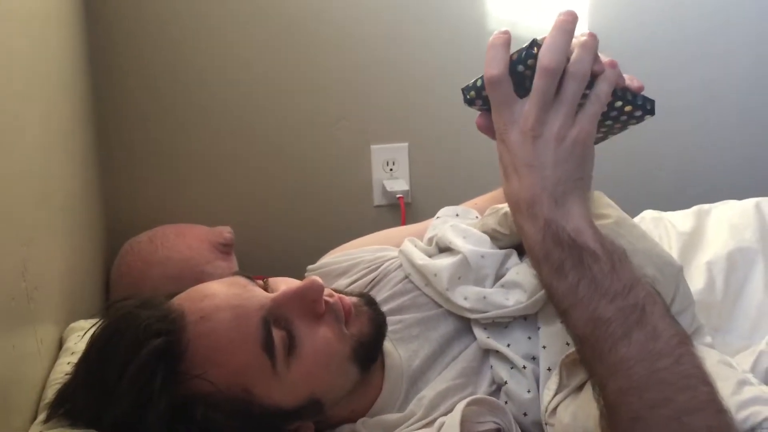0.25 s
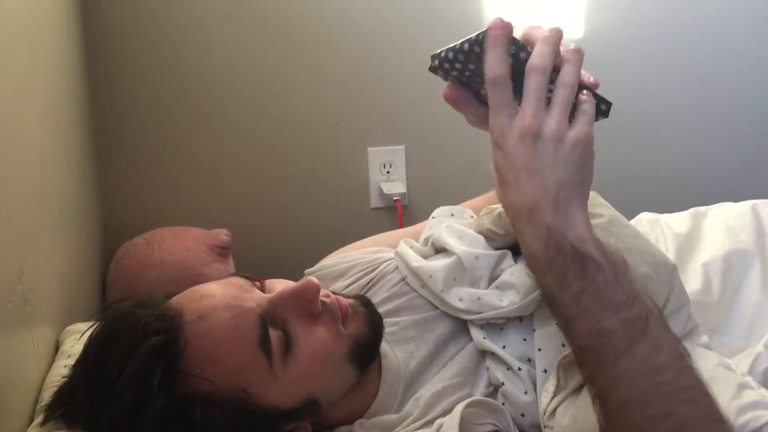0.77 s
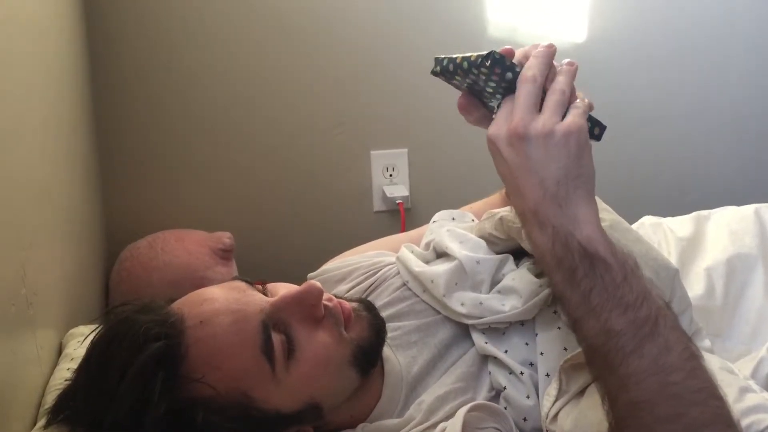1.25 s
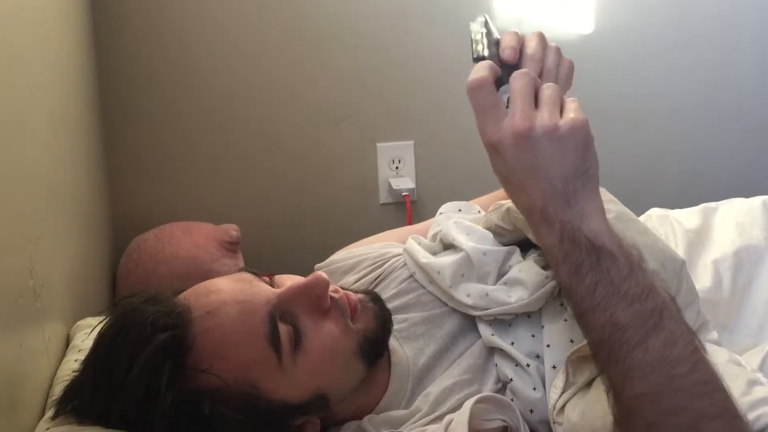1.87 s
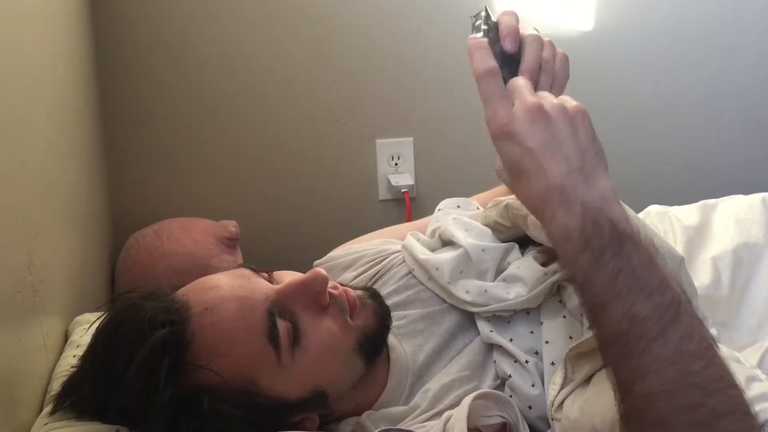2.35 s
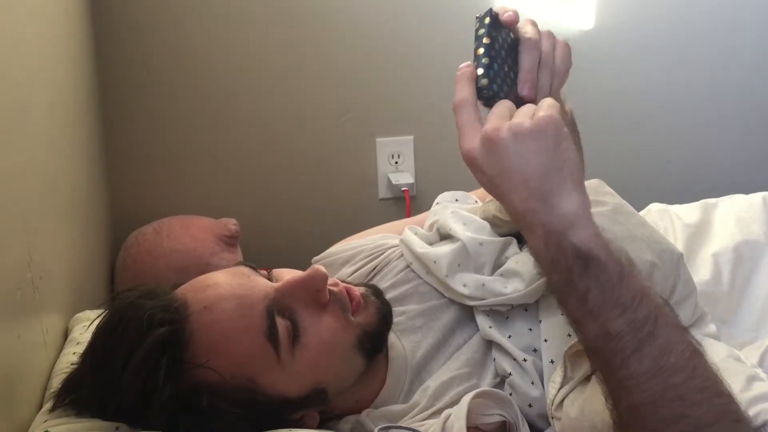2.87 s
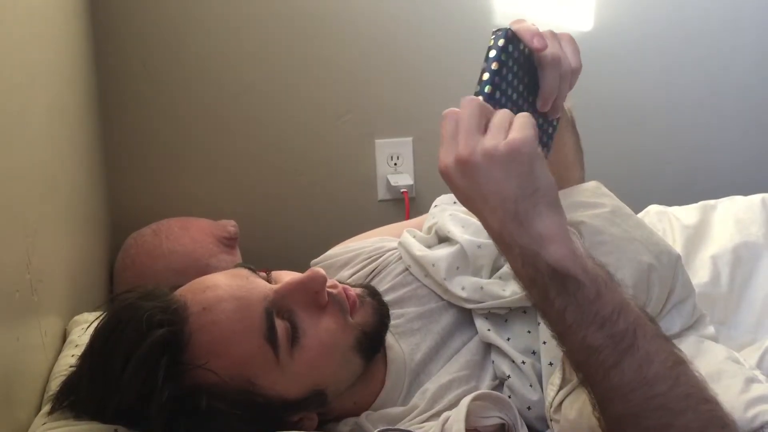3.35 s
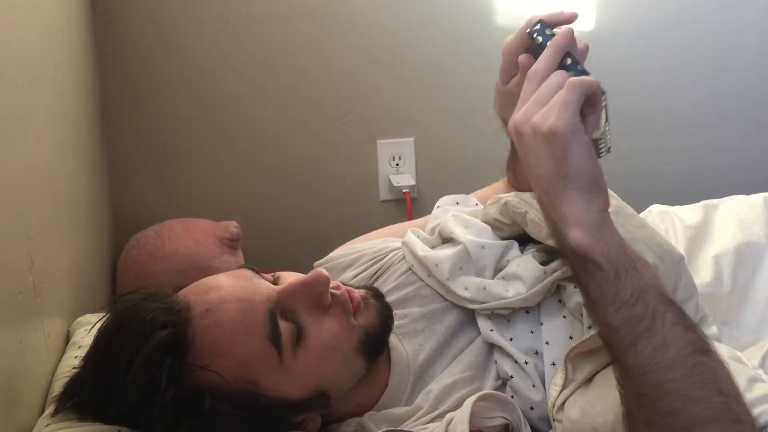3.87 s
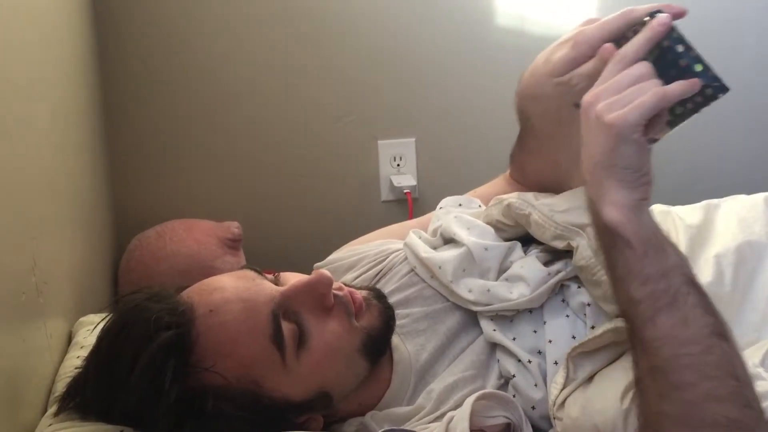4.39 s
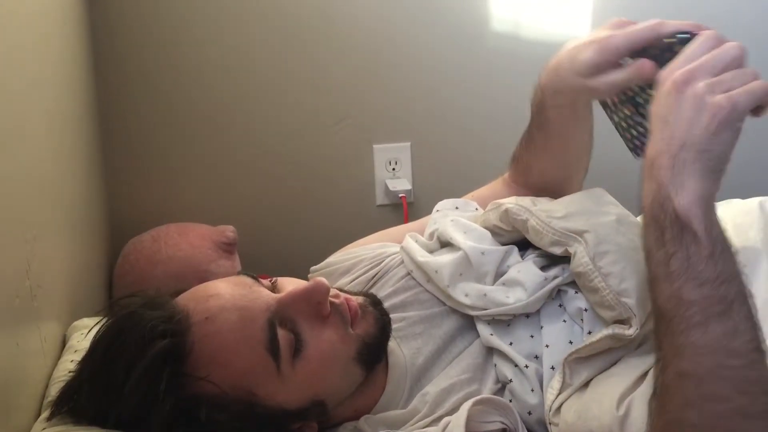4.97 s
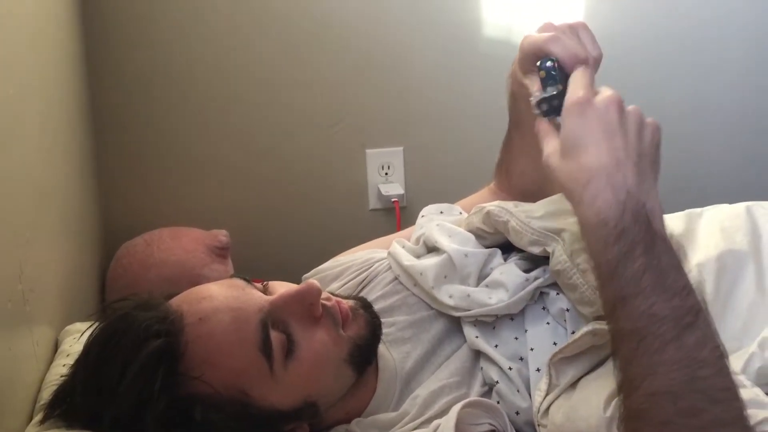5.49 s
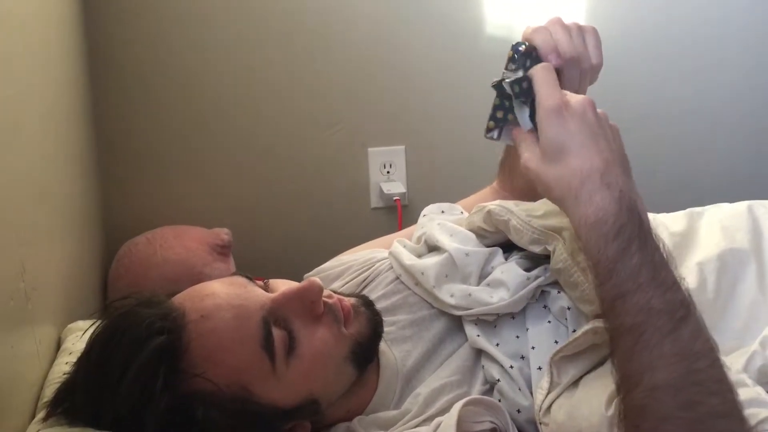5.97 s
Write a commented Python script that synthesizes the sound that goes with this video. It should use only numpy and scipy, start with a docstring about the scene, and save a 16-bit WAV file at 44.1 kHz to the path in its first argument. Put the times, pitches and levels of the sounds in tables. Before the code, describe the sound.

A small box in stiff, glossy gift paper is handled close to the microphone in a quiet bedroom, over faint hiss and low hum. Light snaps open the scene at 0 to 0.1 seconds, then a very sharp, loud double crack lands at 0.55. After a near pause, crackling and sliding rise from 1.25 to 1.9, with crisp snaps around 1.45 and 1.65. It thins out near 2.2; soft crinkles return at 2.4, and a broad rub and short falling squeak come around 2.8 to 2.95. Sparse light ticks and two faint squeaky rubs follow until 3.8. A cluster of snaps breaks out at 4.35 to 4.46, and a stronger one at 4.9 with a dull hollow box knock. From 5.1 to 6.2 smaller snaps and dry rustling continue, with a short, faint room echo.

```python
"""Sharp snaps of stiff gift paper over a low hum come first; then sliding, crackling and a few rubs and squeaks.
Hands pick at a small wrapped box and tear its paper, close to the microphone in a quiet bedroom.
Buckling creases are bursts of spiky noise that ring facets of paper; hollow knocks of the box go with them.
Sliding is noise, slips and small creases through wandering resonances; squeaks are gliding bands of noise.
Near echoes and a diffuse room tail answer the paper; filtered noise and tones form the background."""
import sys
import numpy as np
from scipy import signal
from scipy.fft import rfft, irfft, next_fast_len
from scipy.io import wavfile
from scipy.ndimage import map_coordinates

SR = 44100
rng = np.random.default_rng(int(sys.argv[2]) if len(sys.argv) > 2 else 0)


def to_wav(s):
    """Save 16-bit WAV."""
    ch = np.atleast_2d(s).T  # columns
    pcm = np.round(np.clip(ch, -1, 1) * 32767)  # PCM
    wavfile.write(sys.argv[1], SR, pcm.astype(np.int16))


N = 274895
TIME = np.arange(N) / SR


def gain_of(db):
    """Level law: decibels to an amplitude ratio."""
    return 10 ** (np.asarray(db) / 20)


def evened(x):
    """Normalization: scales to an rms of 1."""
    return x / np.sqrt(np.mean(x ** 2) + 1e-20)


def read(points, hz):
    """Interpolation of a spectral table on a logarithmic frequency axis."""
    f, value = np.transpose(points)
    return np.interp(np.log(hz + 1), np.log(f + 1), value)


def add(mix, s, sound):
    """Superposition: adds a sound to the mix, in place, from time s."""
    part = mix[max(0, round(s * SR)):][:len(sound)]
    part += sound[:len(part)]


def coloured(x, colour):
    """Linear filtering: multiplies the spectrum by a table of f/Hz, gain/dB."""
    size = next_fast_len(N + SR)
    gain = gain_of(read(colour, np.fft.rfftfreq(size, 1 / SR)))
    return irfft(rfft(x, size) * gain, size)[:N]


def noise(colour):
    """Stationary noise: white noise shaped by a spectral table, rms 1."""
    return evened(coloured(rng.standard_normal(N), colour))


def drift(per_s):
    """Slow random modulation: a smooth curve through per_s normal random points a second."""
    coarse = TIME[::64]
    points = rng.standard_normal(2048)
    curve = map_coordinates(points, [coarse * per_s], order=2, mode="wrap")
    return np.interp(TIME, coarse, curve)


# Low rumble of the room and the moving arms: t/s, relative level/dB
RUMBLE_LEVEL = [(0.0, -55), (1.5, -58.5), (2.2, -62.5), (2.78, -61.5), (2.86, -54), (3.8, -56.5),
                (4.75, -61), (4.91, -55.5), (5.01, -67.5), (6.23, -65.5)]
# Spectral shape of the rumble: f/Hz, relative level/dB
RUMBLE_SPECTRUM = [(22, -31), (35, -15.5), (45, -1), (72, -9.5), (92, 8), (122, 0.5), (155, -17),
                   (300, -35.5)]
# Spectral shape of the still air: f/Hz, relative level/dB
AIR_SPECTRUM = [(200, 0.5), (400, -4.5), (700, -14), (1500, -14), (4000, -24), (9000, -33.5), (16000, -36)]
# Steady hum tones: f/Hz, rms level/dB
HUM_TONES = [(60, -68), (91.5, -67.5)]


def background(rumble_db=1.0, air_db=-69, swell_db=0.5):
    """Stationary and modulated sources: swelling rumble, phase-wavering hum and faint hiss."""
    rumble_level = np.interp(TIME, *np.transpose(RUMBLE_LEVEL)) + rumble_db + swell_db * drift(9.2)
    rumble = gain_of(rumble_level) * noise(RUMBLE_SPECTRUM)
    hum = sum(gain_of(db) * np.sqrt(2) * np.sin(2 * np.pi * hz * TIME + .4 * drift(4.4))
              for hz, db in HUM_TONES)
    return rumble + hum + gain_of(air_db) * noise(AIR_SPECTRUM)


def facet(x, hz, width):
    """Damped resonance: a flat piece between creases rings briefly; width/Hz holds at 2 kHz, growing as sqrt(f)."""
    pole = np.exp((2j * np.pi * hz - np.pi * width * np.sqrt(hz / 2000)) / SR)
    return 2 * signal.lfilter([1 - abs(pole)], [1, -pole], x).real


# Bands of the whole sheet, wide panels, small facets and breaking fibres: low f/Hz, high f/Hz
VIBRATION_BANDS = [(340, 973), (1000, 2003.6), (2050, 6430), (6300, 15300)]
PAPER_FILTERS = [signal.butter(4, np.clip(edges, 20, SR / 2 - 100), "band", fs=SR, output="sos")
                 for edges in VIBRATION_BANDS]


def paper(sheet, flap_db, crisp_db, body_db):
    """Radiation by scale: weighs the sheet's vibration from its slow bending up to its fibres."""
    # relative to the small facets; the whole sheet follows the wide panels
    levels = (flap_db + body_db, flap_db, 0, crisp_db)
    return sum(gain_of(db) * evened(signal.sosfilt(sos, sheet)) for db, sos in zip(levels, PAPER_FILTERS))


def snap(level_db, flap_db, crisp_db, hz, main_db, others_db,
         ring=.018, spike_db=3, width=270, body_db=-18, rise=0.0004):
    """Buckling instability: a spiky noise burst rings the buckling facet and its random neighbours."""
    t = TIME[:1536]
    spikes = gain_of(spike_db * np.clip(rng.standard_normal(len(t)), -2, 2))
    run = rng.standard_normal(len(t)) * spikes
    # ring/s is the time to fall 60 dB, rise/s the onset's time constant
    run *= gain_of(-60 * t / ring) * (1 - np.exp(-t / rise))
    others_hz = np.geomspace(1200, 11000, num=9) * np.exp(rng.uniform(-.14, 0.12, 9))
    others = sum(rng.random() * facet(run, f, width) for f in others_hz)
    sheet = run + gain_of(main_db) * facet(run, hz, width) + gain_of(others_db) * others
    # the level refers to the same energy spread over 8 ms
    span_gain = np.sqrt(.008 * SR / len(t))
    return gain_of(level_db) * span_gain * paper(sheet, flap_db, crisp_db, body_db)


# Snaps of the paper: t/s, relative level/dB, wide-panel flap/dB, crispness/dB, buckling facet f/Hz
SNAPS = [(0.002, -35, -6.5, -8.5, 3830), (0.0423, -30.5, -6, -11, 1914), (0.1099, -24, -15.5, -14.5, 6230),
         (0.539, -21, -2, -6, 2110), (0.5513, -11.5, -7, 0, 4686), (0.5535, -12.5, -2.5, -6.5, 3300),
         (0.7322, -30.5, -39, -11, 4966), (1.0109, -46, -15, -17, 3300), (1.086, -45.5, -2.5, -5, 3500),
         (1.196, -49.5, -3, -5, 3675), (1.242, -46, -10, -1, 5300), (1.4312, -22, -4.5, 0, 2030),
         (1.4678, -21, -14, 2.5, 6600), (1.6396, -28.5, -3, -1, 6540), (1.763, -28.5, -12.5, -3, 2330),
         (1.8755, -38, -8, 0, 4680), (1.931, -44, 1.5, 5.5, 6720), (2.0654, -52, 0, -15, 2082),
         (2.398, -40.5, -15.5, -17, 3420), (2.4598, -37, -5, -9, 2120), (2.5405, -39.5, -6, -10, 1990),
         (2.8867, -37.5, -10.5, -2.5, 3580), (3.166, -34, -15, -4.5, 3240), (3.28, -40, -14.5, -3, 6880),
         (3.315, -42.5, -7, -12, 2170), (3.841, -44.5, -0.5, 0, 3254), (3.9169, -32, -10, -5.5, 3810),
         (4.1892, -50.5, -2, 7.5, 6503), (4.326, -44.5, 1.5, -20, 2745), (4.336, -43.5, -11, 3, 5170),
         (4.3528, -30, -10, 1, 6100), (4.4312, -21, -6, -16, 2880), (4.441, -27.5, -5.5, -1, 2760),
         (4.447, -39, 4, 9, 6600), (4.4635, -23.5, -36, -6.5, 4300), (4.883, -27.5, -6, -1.5, 5630),
         (4.8914, -18, -4, -9, 2500), (4.8983, -14.5, -5, -5, 2600), (5.037, -35, -7, -10, 2450),
         (5.109, -40, -2.5, -7.5, 2600), (5.217, -31, -7, -15.5, 2530), (5.5064, -37, -11.5, -12, 3200),
         (5.6492, -36.5, -5.5, -8, 3120), (5.6744, -33, -8, -7, 2730), (5.8246, -36, -29, -11, 6000),
         (5.8632, -33, -19.5, -6.5, 6300), (6.0294, -41, -1.5, -9, 3100), (6.0857, -42, -16, -0.5, 6400)]


def snaps(rows, main_db=9, others_db=5, room_main_db=1, room_others_db=-8, count=3):
    """Directivity: direct snaps favour one facet; those thrown in other directions favour it less."""
    direct, thrown = np.zeros(N), np.zeros((count, N))
    for s, *shape in rows:
        add(direct, s, snap(*shape, main_db, others_db))
        for way in thrown:
            add(way, s, snap(*shape, room_main_db, room_others_db) / np.sqrt(count))
    return direct, thrown


# Hollow modes of the box, before random variation: f/Hz, relative level/dB, t60/s
BOX_MODES = [(180, -1.5, 0.041), (272, -1.5, 0.098), (405, -3, 0.068), (520, 0, 0.057), (624, -0.5, 0.057)]
# Further hollow knocks of the box, some together with snaps: t/s, relative level/dB
FURTHER_KNOCKS = [(1.4342, -45), (1.6403, -46), (3.192, -47.5), (4.451, -40.5), (4.89, -39.5),
                  (4.91, -34.5), (5.026, -50)]


def knocks(box_db=2.0, tug_db=-35, tug_slope=0.54):
    """Modal excitation: each knock rings the box, each mode's pitch varying at random from knock to knock."""
    out, t = np.zeros(N), TIME[:4096]
    # every snap in the table tugs at the box; tug_slope is dB of knock per dB of wide-panel flap
    tugs = [(s, tug_db + tug_slope * (level_db + flap_db)) for s, level_db, flap_db, *_ in SNAPS]
    for s, level_db in tugs + FURTHER_KNOCKS:
        for hz, db, t60 in BOX_MODES:
            decay = gain_of(level_db + box_db + db - 60 * t / t60)
            varied_hz = hz * rng.uniform(0.83, 1.2)
            add(out, s, rng.choice([-1, 1]) * decay * np.sin(2 * np.pi * varied_hz * t))
    return out


# Reflections from near surfaces: delay t/s, level/dB
NEAR_SURFACES = [(.0022, -21), (.0054, -15.5), (.0061, -19)]


def near_echoes(x):
    """Early reflection: hands, wall and bed return delayed, weaker copies within a few milliseconds."""
    out = x.copy()
    for delay, db in NEAR_SURFACES:
        add(out, delay, gain_of(db) * x)
    return out


# Decay of the room: f/Hz, t60/s
ROOM_DECAY = [(250, 0.04), (700, .5), (1700, .5), (4500, 0.42), (8000, 0.35), (14000, 0.15)]
# Spectral shape of its tail at the start: f/Hz, relative level/dB
ROOM_SPECTRUM = [(150, -5), (600, -0.5), (1200, -4), (3500, -2.5), (7000, -2.5), (10000, 0.5), (16000, -2)]


def room(x, start=0.001, build=0.0013):
    """Diffuse reverberation: dense reflections of random sign, each band dying at its own speed."""
    taps = rng.choice([-1., 1.], SR) * (rng.random(SR) < 7000 / SR)
    taps *= 1 - np.exp(-np.maximum(TIME[:SR] - start, 0) / build)
    hz, t, z = signal.stft(taps, SR, nperseg=256)
    z *= gain_of(read(ROOM_SPECTRUM, hz)[:, None] - 60 * t / read(ROOM_DECAY, hz)[:, None])
    tail = signal.istft(z, SR, nperseg=256)[1]
    return signal.fftconvolve(x, tail / np.linalg.norm(tail))[:N]


# Pulls and slides of the fingers: start t/s, length t/s, relative level/dB, wide-panel flap/dB, crispness/dB
STROKES = [(0.522, 0.21, -50.5, 2, 4.5), (0.992, 0.12, -60.5, -8, 4.5), (1.254, 0.15, -44, -9, 7.5),
           (1.437, 0.19, -42.5, -8.5, -0.5), (1.592, 0.19, -35, -10, -1.5), (1.847, 0.1546, -49, -7.5, 0),
           (2.113, 0.031, -64.5, -15, 12.5), (2.39, 0.21, -51, -12, -19), (2.506, 0.2, -49, -11.5, 2.5),
           (2.767, 0.29, -56, 3, -6), (2.874, 0.32, -48, -12.5, 4), (3.137, 0.1, -51, -11, -2.5),
           (3.372, 0.098, -59, -22, -5.5), (3.521, 0.32, -62.5, -9.5, 5), (3.714, 0.091, -48.5, -37, -7),
           (4.312, 0.18, -59, -1.5, 3), (4.741, 0.14, -59.5, -4.5, -26), (4.884, 0.13, -41.5, 4, 3),
           (5.22, 0.08, -48.5, -3.5, -9), (5.586, 0.16, -48, -10, -3.5), (5.789, 0.12, -46, -13.5, -1.5),
           (5.92, 0.087, -49.5, -24, -30.5), (6.034, 0.121, -51, -18.5, -5.5),
           (6.156, 0.21, -45, -2.5, -1.5)]
# Held paper keeps shifting between strokes: t/s, relative level/dB, crispness/dB
SHIFTING = [(0.919, -90.5, -1), (1.08, -73, 1.5), (1.75, -45.5, -5), (2.26, -79, 4), (2.349, -64.5, 6),
            (3.3, -64.5, -2), (3.5, -75, -4), (3.951, -68.5, -3), (4.28, -73, -6), (4.501, -62, 0),
            (4.68, -67, -6.5), (5.099, -50, -6), (5.37, -55.5, -14), (5.55, -54.5, -1.5),
            (6.23, -62.5, -11)]


def handwork(shifting_flap_db=-10, swell_share=0.37, swell_bend=0.84, ease_bend=2.05):
    """Incoherent addition: stroke powers add to the shifting's; gives level, flap and crispness in dB."""
    s, level_db, crisp_db = np.transpose(SHIFTING)
    held = gain_of(np.interp(TIME, s, level_db, left=-140))
    held_crisp = held * gain_of(np.interp(TIME, s, crisp_db))
    power = np.array([held, held * gain_of(shifting_flap_db), held_crisp]) ** 2
    for start, length, db, flap, crisp in STROKES:
        # a stroke swells over swell_share of its length, then eases off; exponents bend the flanks
        progress = np.arange(0, length, 1 / SR) / length
        phase = np.interp(progress, [0, swell_share, 1], [0, .5, 1])
        swell = np.sin(np.pi * phase) ** np.where(phase < .5, swell_bend, ease_bend)
        for band, colour_db in zip(power, (0, flap, crisp)):
            add(band, start, (gain_of(db + colour_db) * swell) ** 2)
    level, flap, crisp = 10 * np.log10(power)
    return level, flap - level, crisp - level


def ticks(level_db, flap_db, crisp_db, count=90, above_db=3, spread_db=4, low_hz=1900, high_hz=6800):
    """Random buckling: small creases give way, louder where the work is stronger; rows as in SNAPS."""
    rows = []
    for when, size, pitch in rng.random((count, 3)):
        i = int(when * N)
        tick_db = level_db[i] + above_db + spread_db * (2 * size - 1)
        hz = low_hz * (high_hz / low_hz) ** pitch
        rows.append((i / SR, tick_db, flap_db[i], crisp_db[i], hz))
    return rows


def clicks(per_s, size_db):
    """Random impulses: sparse clicks, mostly small and a few large, rms 1."""
    sizes = gain_of(size_db * np.minimum(rng.exponential(1, N), 4))
    return evened((rng.random(N) < per_s / SR) * rng.choice([-1, 1], N) * sizes)


def resonate(x, hz, width):
    """Heterodyne resonance: peak gain near 1, following hz (fixed or a curve)."""
    turn = np.exp(2j * np.pi * np.cumsum(hz * np.ones(len(x))) / SR)
    r = np.exp(-np.pi * width / SR)
    return 2 * (turn * signal.lfilter([1 - r], [1, -r], x / turn + 1e-18)).real


def rustle(level_db, flap_db, crisp_db, slide=0.59, crackle=0.7, clump_db=2.5, facet_db=5, facet_width=180,
           body_db=-11, box_db=-11, box_width=50, rustle_db=1.5):
    """Stick-slip friction: clumped slips and small creases excite facets that wander as the sheet bends."""
    # each small crease is a noise burst with a 2.8 ms decay constant
    crease_shape = signal.lfilter([1], [1, -np.exp(-1 / (0.0028 * SR))], clicks(130, 2.1) + 1e-12)
    creases = evened(crease_shape * rng.standard_normal(N))
    slips = clicks(1700, 3.5)
    drive = slips + crackle * creases + slide * rng.standard_normal(N)
    drive *= gain_of(clump_db * drift(110))
    facets = np.zeros(N)
    for hz in np.geomspace(850, 5600, num=7):
        bent_hz = hz * np.exp(.07 * drift(22))
        ringing = resonate(drive, bent_hz, facet_width * np.sqrt(hz / 2000))
        facets += ringing * gain_of(2.5 * drift(8.3))
    sheet = paper(drive + gain_of(facet_db) * facets, flap_db, crisp_db, body_db)
    # the wide panels also scrape on the box
    box = evened(sum(gain_of(db) * facet(drive, hz, box_width) for hz, db, t60 in BOX_MODES))
    return gain_of(level_db + rustle_db) * (sheet + gain_of(flap_db + box_db) * box)


# Rubs and squeaks of the hand on glossy paper, the first one broad:
# t/s, length t/s, start f/Hz, end f/Hz, level/dB, first resonance width f/Hz
SQUEAKS = [(2.792, 0.13, 2030, 1560, -52, 500), (2.924, 0.053, 3884, 2640, -47, 220),
           (3.574, 0.18, 3580, 3380, -62, 170), (3.734, 0.066, 2280, 2620, -55.5, 170)]


def squeaks():
    """Band-limited friction: noise through two gliding resonances makes the rubs and squeaks of the hand."""
    out = np.zeros(N)
    for s, length, start_hz, end_hz, db, width in SQUEAKS:
        hz = np.linspace(start_hz, end_hz, round(length * SR))
        friction = rng.standard_normal(SR)[:len(hz)]
        rub = resonate(resonate(friction, hz, width), hz, 2 * width)
        add(out, s, gain_of(db) * evened(rub * signal.windows.tukey(len(hz), .5)))
    return out


# Colour that the hands and the microphone's port give to all of the paper: f/Hz, gain/dB
PRESENCE = [(400, 0.5), (650, -8), (850, -3), (1150, -2.5), (1450, -1), (1700, -4), (2700, -0.5),
            (3800, 0.5), (6500, -4.5), (13000, 0)]


def scene(rustle_room_db=-9, snap_room_db=-9):
    """Superposition of direct sound, early reflections, diffuse tail and background."""
    work = handwork()
    direct, thrown = snaps(SNAPS + ticks(*work))
    handling = rustle(*work) + squeaks() + knocks()
    handling_share = gain_of(rustle_room_db) * handling / np.sqrt(len(thrown))
    tail = sum(room(gain_of(snap_room_db) * way + handling_share) for way in thrown)
    near = near_echoes(direct + handling)
    return (coloured(near + tail, PRESENCE) + background())[None]


def record(dry, edge_hz=16050):
    """Soft saturation: the input rounds loud peaks towards full scale; then a low-pass limits the band."""
    held = np.tanh(dry)
    lowpass = signal.firwin(255, edge_hz, window=("kaiser", 8), fs=SR)
    return signal.oaconvolve(held, lowpass[None], "same")


dry = scene()
out = record(dry)
to_wav(out)
```